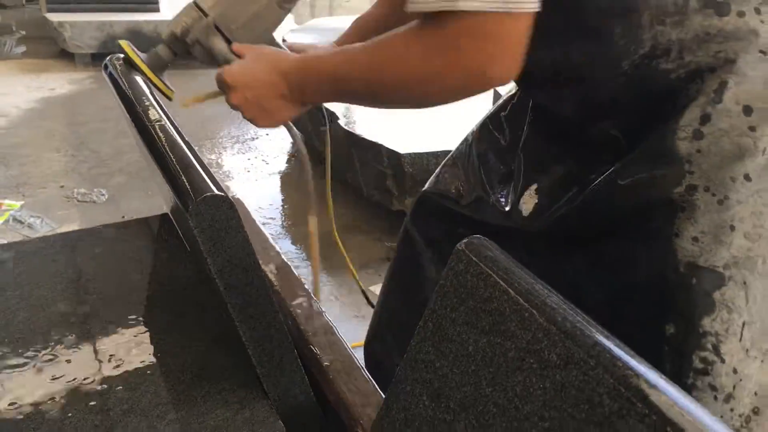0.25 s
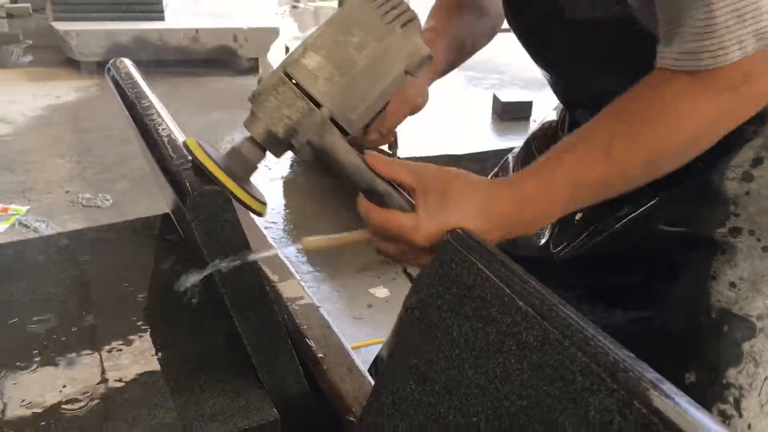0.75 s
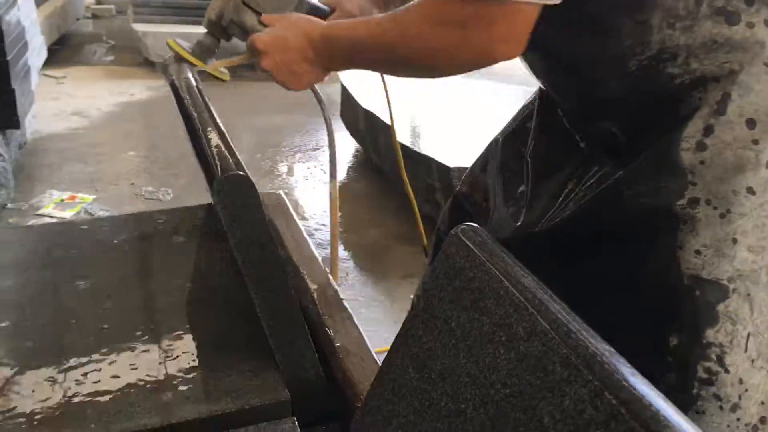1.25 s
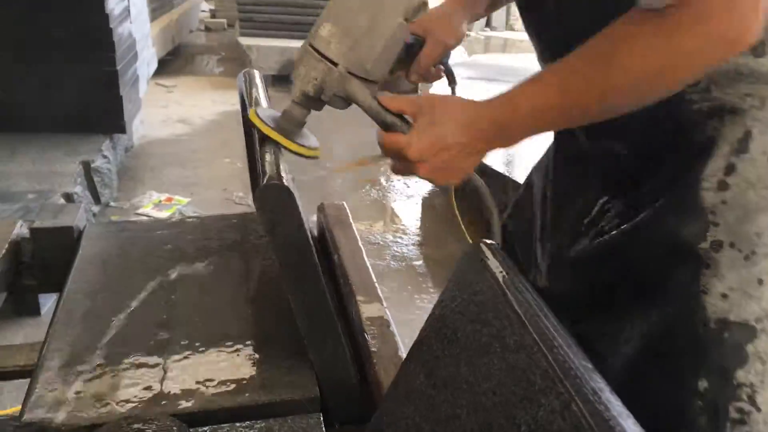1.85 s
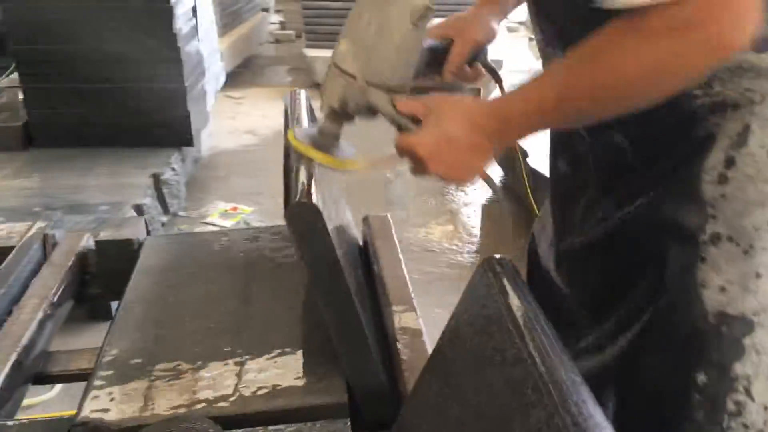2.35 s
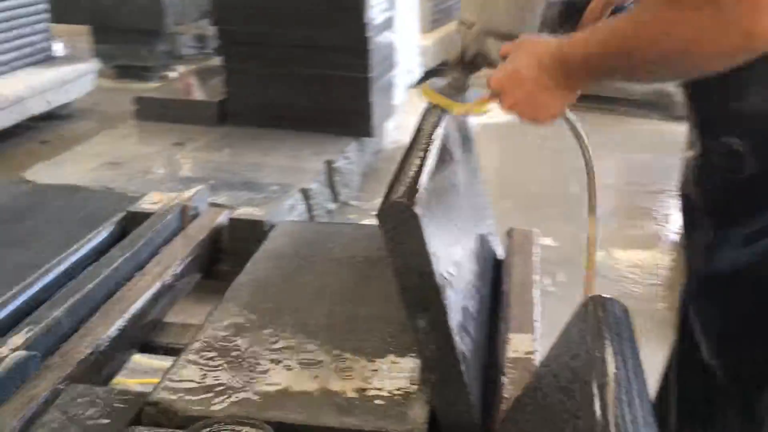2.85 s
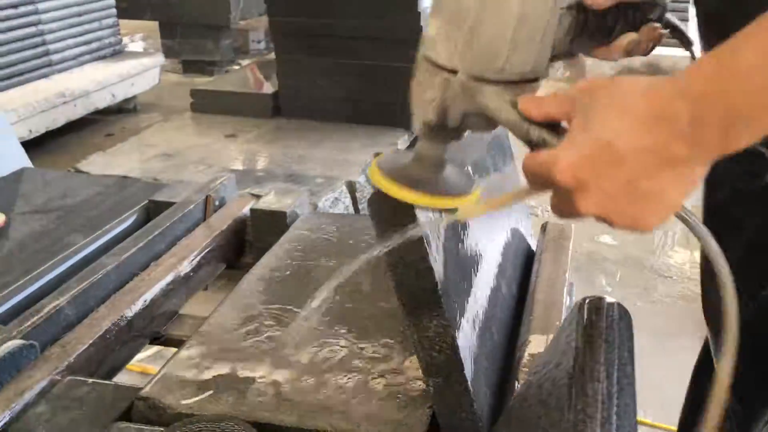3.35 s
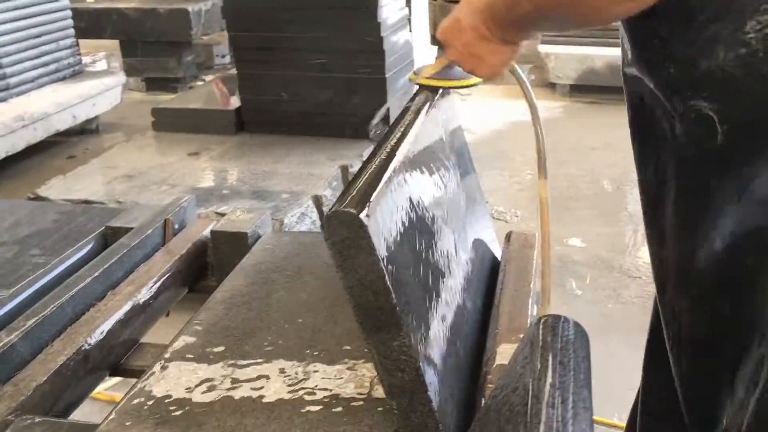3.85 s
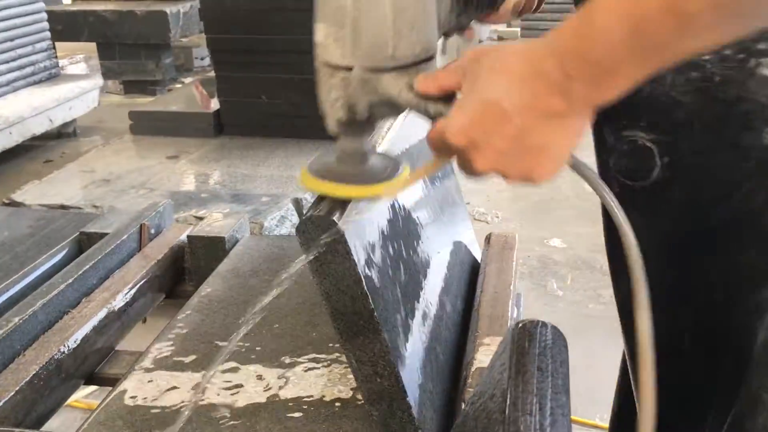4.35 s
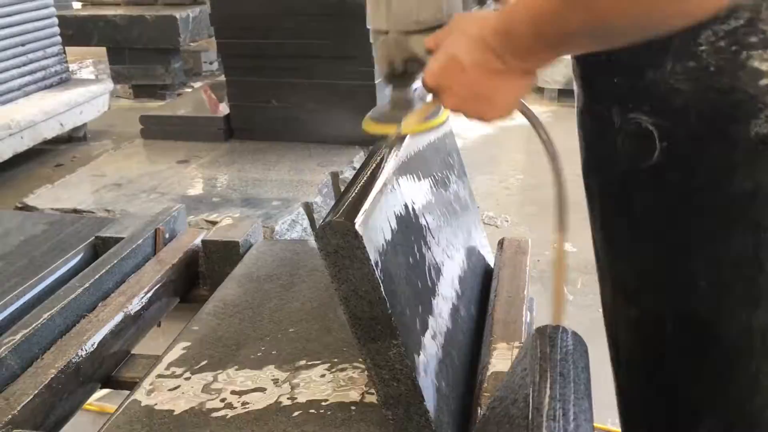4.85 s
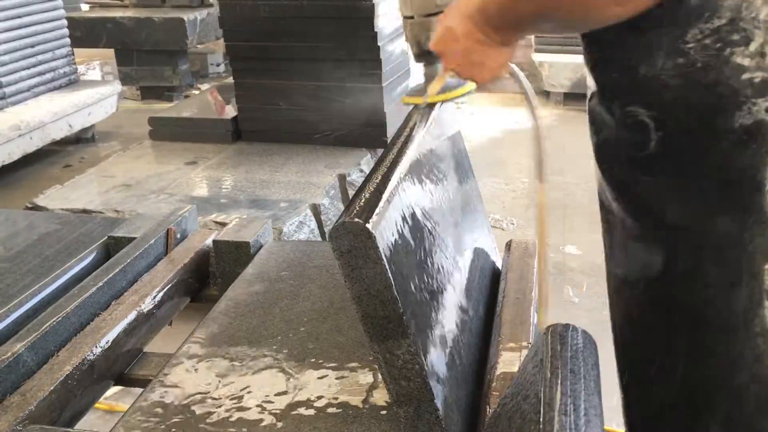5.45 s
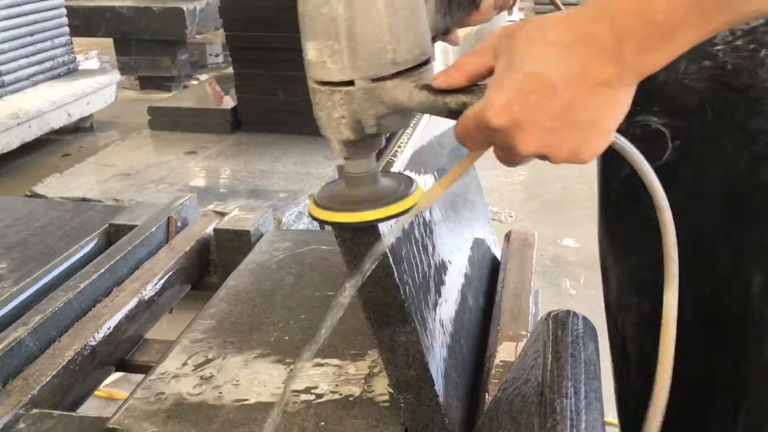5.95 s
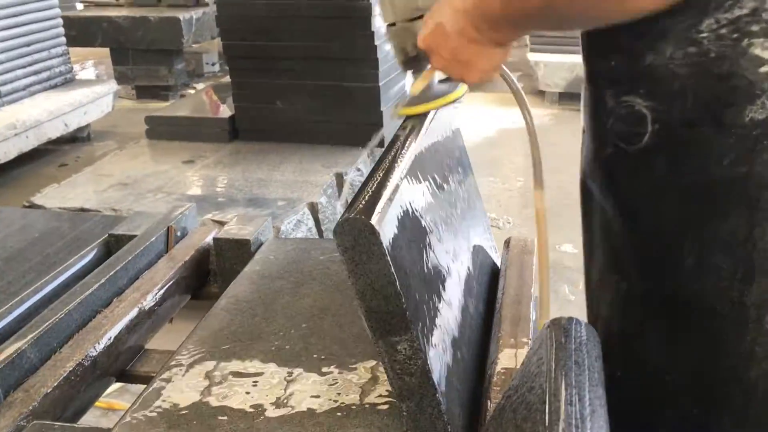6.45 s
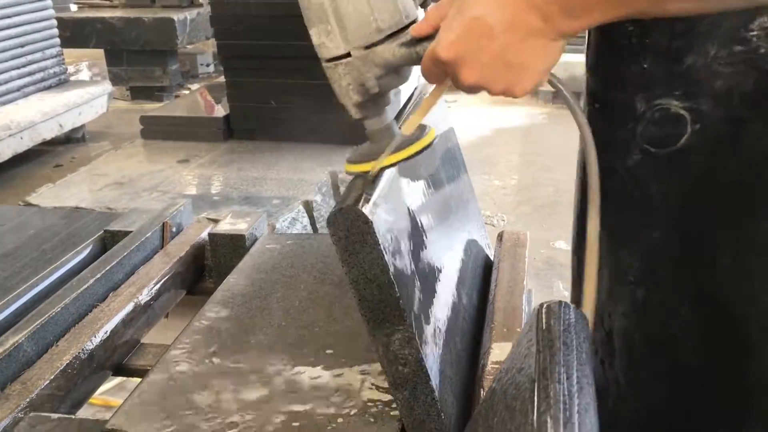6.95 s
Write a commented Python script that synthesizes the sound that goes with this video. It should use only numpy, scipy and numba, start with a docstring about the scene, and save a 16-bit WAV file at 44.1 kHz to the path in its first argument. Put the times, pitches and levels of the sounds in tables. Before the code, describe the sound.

An electric polisher scrubs wet stone with a steady rasping hiss, a wavering high whine and brief thin squeals.

```python
"""A stone shop: a hand-held wet polisher is scrubbed along the edge of a granite slab, a metre away.
The motor whines and sags under load, and cooling air rushes through its housing. The pad grinds,
squeals and sets the slab droning and ringing while water sprays off it; these noises, squeals and
ringing aside, swell as each stroke brings the tool nearer. Other machines rumble behind, and puffs
of wind thump the mono microphone."""
import sys
import numpy as np
from scipy import signal
from scipy.fft import rfft, irfft, next_fast_len
from scipy.io import wavfile
from scipy.ndimage import uniform_filter1d
from numba import njit

SR = 44100
rng = np.random.default_rng(int(sys.argv[2]) if len(sys.argv) > 2 else 0)


def int16_out(signal):
    """Quantize to a 16-bit WAV file."""
    q = np.round(np.clip(np.atleast_2d(signal).T, -1, 1) * 32767)
    wavfile.write(sys.argv[1], SR, q.astype(np.int16))


N = 317079

# slow shifts of balance as the microphone moves round the slab:
# t/s, cooling air/dB, slab drone/dB, slab ring/dB, spray tilt/(dB per octave)
STANCE = [(0, -3.5, 0.5, -25, 7), (.9, 0.5, 1, -24.5, 4.5), (1.9, 0.5, .5, -24, 2),
          (2.6, -0.5, -0.5, -26, 2.5), (3.5, -0.5, -.5, -30, 2.5), (4.66, 1.5, 0, -39.5, 3.5),
          (5.9, 1.5, .5, -34, 3), (7.19, -1.5, 1.5, -30.5, 2.5)]
# the tool swings nearer and away with each stroke: t/s, level/dB
NEARNESS = [(0, 1), (.3, -1), (1.05, -0.5), (1.31, -2.5), (1.72, 1), (2.1, -2), (2.55, 1.5), (3.1, -0.5),
            (3.38, 1.5), (4.02, -1.5), (4.24, 1.5), (4.37, -0.5), (4.5, .5), (4.72, -2.5), (4.94, 1),
            (5.64, -2.5), (5.81, 1), (6.39, -1), (6.59, 0), (7.19, -.5)]


def undb(db):
    return 10 ** (np.asarray(db) / 20)


def unit(x):
    """Scale to rms 1."""
    return x / np.sqrt(np.mean(x ** 2))


def curves(table):
    """One automation curve for each column after the time."""
    times, *columns = np.transpose(table)
    return [np.interp(np.arange(N) / SR, times, column) for column in columns]


@njit
def bandpass(x, hz, width):
    """Sweepable state-variable band-pass with gain 1 at its centre."""
    y, band_state, low_state = np.empty(len(x)), 0., 0.
    for i in range(len(x)):
        g, damping = np.tan(np.pi * hz[i] / SR), width / hz[i]
        band = (band_state + g * (x[i] - low_state)) / (1 + g * (g + damping))
        band_state = 2 * band - band_state
        low_state += 2 * g * band
        y[i] = damping * band
    return y


def wander(rate_hz):
    """Random modulator: sample-and-hold, smoothed twice, rms 1."""
    hold = int(SR / rate_hz)
    steps = np.repeat(rng.standard_normal(N // hold + 1), hold)
    return unit(uniform_filter1d(uniform_filter1d(steps, hold), hold)[:N])


def hiss(spectrum, flicker_db, rate_hz, tilt_db=0):
    """Coloured noise whose third-octave bands each flicker; tilt_db per octave pivots on the middle."""
    hz, db = np.transpose(spectrum)
    size = next_fast_len(N)
    octave = np.log2(np.maximum(np.arange(size // 2 + 1) * SR / size, 1))
    colour = undb(np.interp(octave, np.log2(hz), db, left=-99, right=-99))
    shaped = rfft(rng.standard_normal(size)) * colour
    centres = np.arange(np.log2(hz[0]), np.log2(hz[-1]) + 1 / 3, 1 / 3)
    out = 0
    for centre in centres:
        band = irfft(shaped * np.clip(1 - 3 * np.abs(octave - centre), 0, 1), size)[:N]
        out += band * undb(flicker_db * wander(rate_hz) + tilt_db * (centre - centres.mean()))
    return out / np.std(irfft(shaped, size))


def resonate(modes, drift, flicker_db, rate_hz):
    """Noise-driven resonances that drift in pitch and flicker in level."""
    out = 0
    for hz, width, db in modes:
        centre = hz * (1 + drift * wander(2.91))
        tone = rng.standard_normal(N)
        for _ in range(2):  # two wider passes narrow to the mode's width
            tone = bandpass(tone, centre, 1.54 * width)
        out += unit(tone) * np.sqrt(width) * undb(db + flicker_db * wander(rate_hz))
    return unit(out)


def burst(middle_s, length_s, hz, width, db, glide, order):
    """A gliding band of noise that swells and fades; a higher order has steeper skirts."""
    out, n = np.zeros(N), int(length_s * SR)
    pitch = hz * (1 + glide * np.linspace(-.5, .5, n))
    tone = rng.standard_normal(SR)[:n]
    for _ in range(order):
        tone = bandpass(tone, pitch, float(width))
    start = int(middle_s * SR) - n // 2
    out[start:start + n] = undb(db) * np.sin(np.linspace(0, np.pi, n)) * unit(tone)
    return out


def stroke_gain(db, depth):
    """A fader set at db that rides the tool's nearness, scaled by depth."""
    return undb(db + depth * curves(NEARNESS)[0])


def shop():
    """The bed: other machines rumble, with a low hum that wavers and swells."""
    spectrum = [(15, -37), (25, -4), (124, -0.5), (345, -3.5), (557, -8), (600, -4.5), (900, -6),
                (1170, -18), (1980, -120)]  # rumble colour: f/Hz, level/dB
    rumble_ride = [(0, -0.5), (4.5, 0), (6.2, 2), (7.19, 1.5)]  # slow rise of the rumble: t/s, level/dB
    hum_swells = [(1.3, .5, -48), (2.07, .37, -41), (3.07, .37, -46)]  # swells of the hum: start/s, length/s, level/dB
    t, fade_s = np.arange(N) / SR, .08
    hum_hz = 57.5 * (1 + .06 * wander(12))
    hum_gain = undb(-51.5)  # floor between swells
    for start, length, db in hum_swells:
        inside_s = np.minimum(t - start, start + length - t)
        hum_gain += undb(db) * np.clip(inside_s / fade_s + .5, 0, 1)
    hum_gain *= undb(3.2 * wander(11))
    hum = np.sqrt(2) * hum_gain * np.sin(2 * np.pi * np.cumsum(hum_hz) / SR)
    rumble = undb(-35.5 + curves(rumble_ride)[0]) * hiss(spectrum, flicker_db=1.6, rate_hz=6)
    return rumble + hum


def wind():
    """Puffs hit the microphone as low, sinking thumps; a stronger puff is higher and wider."""
    puffs = [(.37, .05, -21.5), (.41, 0.071, -22.5), (0.498, 0.13, -35.5), (0.576, 0.06, -32),
             (0.716, .06, -26.5), (.77, .05, -24.5), (.805, 0.031, -20.5), (.84, .07, -28.5),
             (2.79, .09, -28.5), (3.2, .4, -38), (5.59, .07, -32)]  # wind puffs: middle/s, length/s, level/dB
    out, weakest_db = 0, min(db for _, _, db in puffs)
    for middle, length, db in puffs:
        opening_hz = 3.5 * (db - weakest_db)
        out += burst(middle, length, hz=60 + opening_hz / 2, width=110 + opening_hz,
                     db=db, glide=-.3, order=1)
    return signal.sosfilt(signal.butter(2, 700, fs=SR, output="sos"), out)


def reflections(x):
    """Slab, bench and wet floor add echoes that shift as the tool moves: a drifting comb filter."""
    echoes = [(2.3, .3, -16), (4.7, .35, -14), (7.3, .4, -14), (11.3, .4, -15)]  # early reflections: delay/ms, wander/ms, level/dB
    now, out = np.arange(N), x.copy()
    for delay_ms, wander_ms, db in echoes:
        delay = (delay_ms + wander_ms * wander(4)) * SR / 1000
        out += undb(db) * np.interp(now - delay, now, x)
    return out * np.std(x) / np.std(out)


def slab_ring():
    """The pad excites the granite's narrow modes into a thin shimmer."""
    modes = [(1108, 35, 1), (1630, 45, -6), (2970, 60, -3), (3140, 70, -2), (3540, 50, -5), (3775, 40, -3),
             (4060, 50, -6), (4380, 45, -2), (4780, 40, -6), (5225, 40, -3), (5880, 45, -5), (6830, 70, -8),
             (7110, 50, -7), (7770, 55, -7), (8380, 80, -5), (8720, 120, -8), (9250, 80, -7),
             (10000, 110, -6), (11200, 200, -8), (11900, 90, -8), (12500, 120, -8)]  # slab modes: f/Hz, width/Hz, level/dB
    return resonate(modes, drift=.002, flicker_db=2.2, rate_hz=7)


def slab_drone():
    """The slab answers the pad with a broad midrange body."""
    spectrum = [(290, -31), (500, -13.5), (764, -14), (843, -5.5), (1110, -1), (1390, -5.5), (1660, -4.5),
                (2330, -9.5), (2700, -8), (3510, -26), (5940, -120)]  # drone colour: f/Hz, level/dB
    return stroke_gain(-27.5, depth=.97) * hiss(spectrum, flicker_db=.75, rate_hz=6)


def cooling_air():
    """Air rushes through the housing and sounds its high, breathy resonances."""
    modes = [(5960, 250, 3), (6220, 230, -1), (6820, 510, -4), (5480, 550, -5.5), (11660, 430, -10)]  # housing resonances: f/Hz, width/Hz, level/dB
    return stroke_gain(-26, depth=1.9) * resonate(modes, drift=.006, flicker_db=1.2, rate_hz=9)


def water_spray(tilt_db):
    """Water flies off the pad in a bright hiss."""
    spectrum = [(2940, -37), (5000, -7.5), (5830, -4), (7440, -7.5), (9730, -6.5), (10600, -9.5),
                (12100, -8.5), (15100, -9.5), (15700, -11)]  # spray colour: f/Hz, level/dB
    return stroke_gain(-24, depth=1.2) * hiss(spectrum, flicker_db=.95, rate_hz=12, tilt_db=tilt_db)


def pad_squeals():
    """The pad squeals in narrow bands; the shorter and higher a squeal, the scratchier it is."""
    squeals = [(.5, .22, 3540, 0, -34), (1.15, .25, 5225, 0, -35), (1.75, .3, 5905, -1.5, -32),
               (1.81, .1, 2060, 0, -33), (2.9, .15, 3100, 0, -32), (3.3, .25, 2945, 1, -33),
               (3.68, .15, 2915, -2.4, -32), (3.85, .4, 4170, 0, -33), (3.85, .3, 14215, 1, -35),
               (3.9, .3, 10475, -2.4, -35), (4.38, .14, 10725, -.5, -31), (4.88, .18, 15425, -3, -30),
               (4.88, .12, 10200, -1, -31), (4.9, .2, 13925, -3.2, -30), (4.8, .15, 4650, -5, -35),
               (4.92, .12, 4100, -2.4, -32), (4.95, .2, 3015, -1, -32), (5.33, .13, 10800, 0, -30),
               (5.82, .1, 11200, 0, -32), (5.83, .1, 4425, -1, -31), (6.8, .6, 4575, 0, -34)]  # pad squeals: middle/s, length/s, f/Hz, glide/%, level/dB
    return sum(burst(middle, length, hz, width=hz * .0036 / length, db=db, glide=percent / 100, order=2)
               for middle, length, hz, percent, db in squeals)


def pad_grind():
    """The pad abrades the stone with an upper-midrange rasp."""
    spectrum = [(1180, -44), (2000, -4.5), (2330, -7), (3060, 1.5), (4480, -0.5), (4910, -5.5), (5400, -4),
                (7020, -42), (11900, -120)]  # grinding colour: f/Hz, level/dB
    return stroke_gain(-25, depth=.65) * hiss(spectrum, flicker_db=1, rate_hz=11)


def motor():
    """A whine of clean partials locked to the armature, whose inertia rounds every change of speed."""
    speed = [(0, 6730), (.54, 6547), (.9, 6275), (1.06, 6265), (1.24, 6132), (1.58, 6135), (1.73, 6015),
             (1.9, 6004), (2.12, 5697), (2.34, 5796), (2.56, 5705), (2.75, 5737), (2.99, 5510), (3.2, 5709),
             (3.44, 5704), (3.62, 5820), (3.87, 5625), (4.07, 5738), (4.27, 5608), (4.45, 5718),
             (4.71, 5415), (4.88, 5535), (5.1, 5468), (5.32, 5655), (5.57, 5468), (5.98, 5560),
             (6.19, 5795), (6.37, 5795), (6.6, 5935), (6.85, 5888), (7.19, 5890)]  # commutator whine, sagging when the pad is pressed down: t/s, f/Hz
    whine_ride = [(0, -46), (.37, -32), (.7, -32), (.79, -25), (.88, -29), (1.04, -28), (1.2, -29),
                  (1.26, -44), (1.52, -44), (1.6, -31), (1.73, -27), (2.02, -26), (2.14, -46), (2.48, -31),
                  (2.6, -39), (2.76, -31), (2.96, -27), (3.04, -46), (3.2, -33), (3.4, -22), (3.5, -42),
                  (3.58, -25), (3.65, -35), (3.76, -23), (3.86, -37), (3.91, -31), (4.02, -42),
                  (4.08, -26.5), (4.26, -18.5), (4.39, -34), (4.52, -20), (4.94, -40.5), (5.01, -28),
                  (5.1, -21), (5.22, -37), (5.34, -21), (5.5, -30), (5.82, -46), (5.89, -28), (5.98, -27),
                  (6.12, -42), (6.25, -26), (6.36, -37), (6.44, -27), (6.57, -19.5), (7.19, -23)]  # the whine comes and goes as the tool turns and travels: t/s, level/dB
    partials = [(.5, -17), (1, 0), (1.058, -15), (2, -22)]  # motor partials: multiple of the whine, relative level/dB
    inertia_s, wobble = .05, .0016
    hz = uniform_filter1d(curves(speed)[0], int(inertia_s * SR))
    phase = 2 * np.pi * np.cumsum(hz * (1 + wobble * wander(90))) / SR
    tones = sum(undb(db + 1.8 * wander(60)) * np.sin(multiple * phase) for multiple, db in partials)
    return np.sqrt(2) * undb(curves(whine_ride)[0]) * tones


def polisher():
    """The tool on the stone: whine, ring and squeals stay dry, the broad noises get reflections."""
    air_db, drone_db, ring_db, spray_tilt_db = curves(STANCE)
    whine = motor()
    wash = water_spray(spray_tilt_db) + undb(air_db) * cooling_air()
    body = pad_grind() + undb(drone_db) * slab_drone()
    ring = undb(ring_db) * slab_ring()
    return whine + ring + reflections(wash + body) + pad_squeals()


def scene():
    """Polisher, shop and wind, the same on both channels."""
    mono = polisher() + shop() + wind()
    return np.array([mono, mono])


def record(dry):
    """The microphone loses the deepest bass and cuts the top steeply."""
    low_cut_hz, high_cut_hz = 36, 15750
    thinned = signal.sosfilt(signal.butter(3, low_cut_hz, "high", fs=SR, output="sos"), dry)
    return signal.sosfilt(signal.ellip(12, .2, 80, high_cut_hz, fs=SR, output="sos"), thinned)


dry = scene()
out = record(dry)
int16_out(out)
```